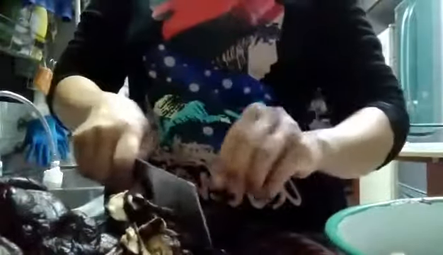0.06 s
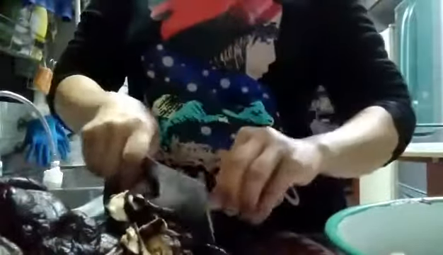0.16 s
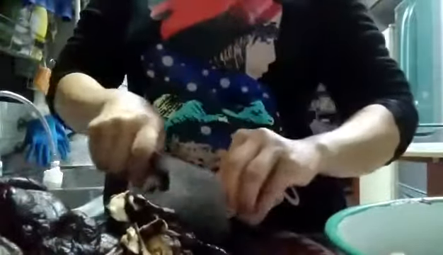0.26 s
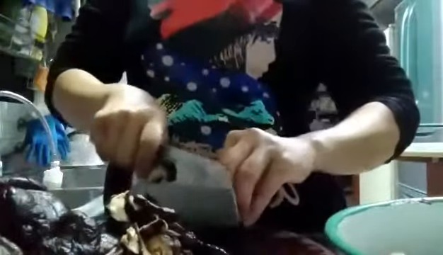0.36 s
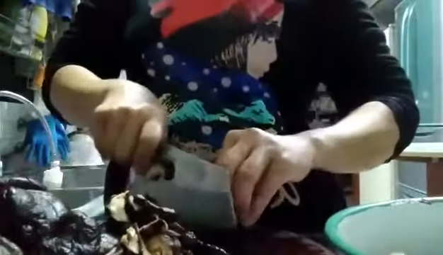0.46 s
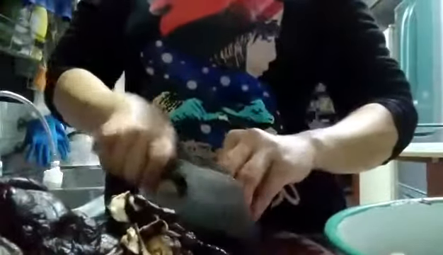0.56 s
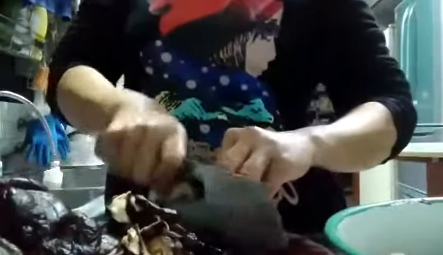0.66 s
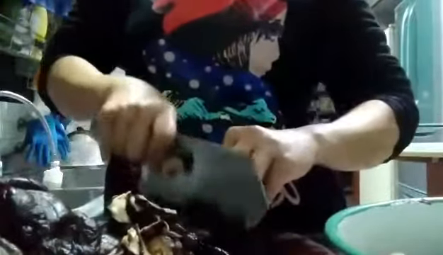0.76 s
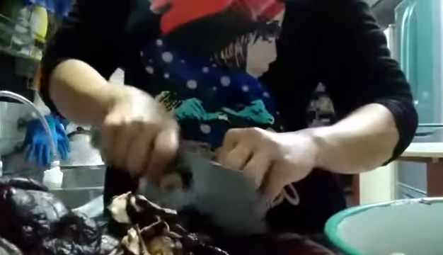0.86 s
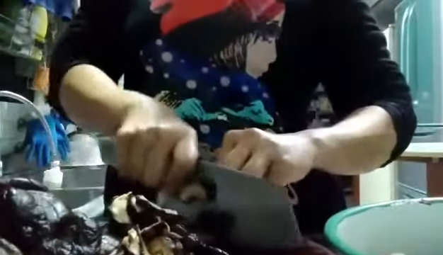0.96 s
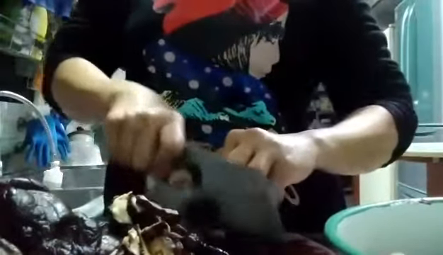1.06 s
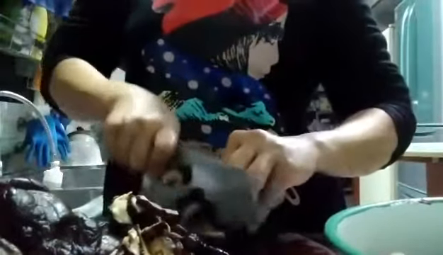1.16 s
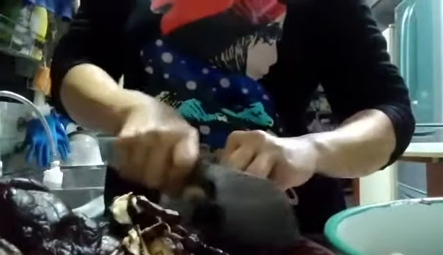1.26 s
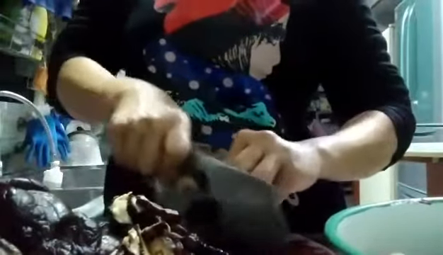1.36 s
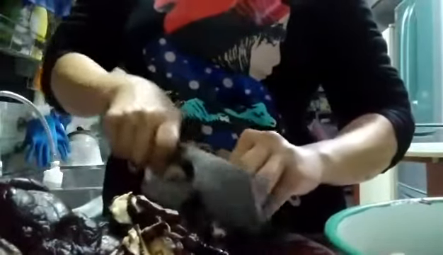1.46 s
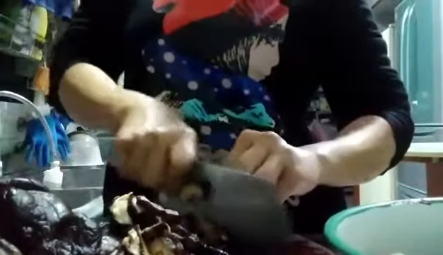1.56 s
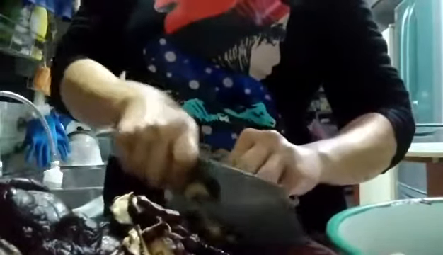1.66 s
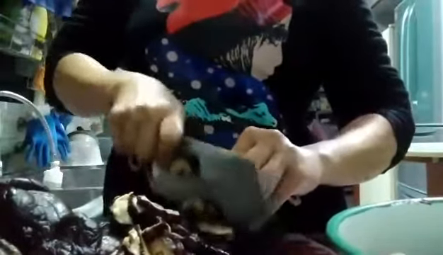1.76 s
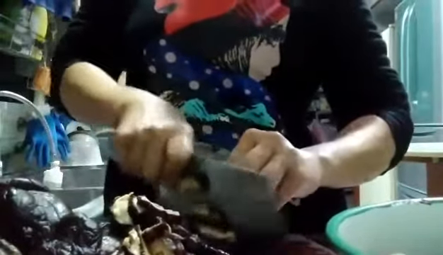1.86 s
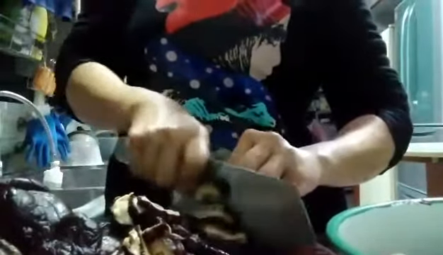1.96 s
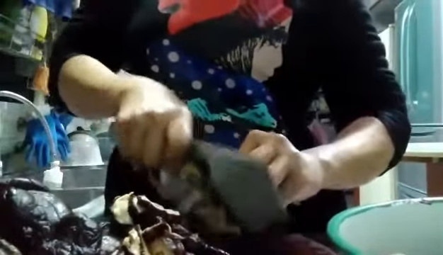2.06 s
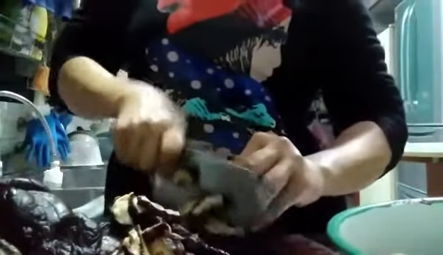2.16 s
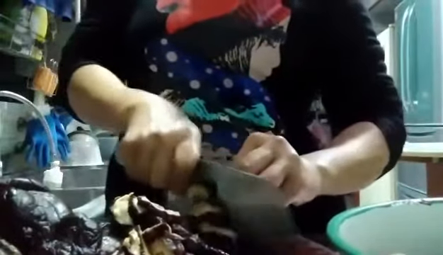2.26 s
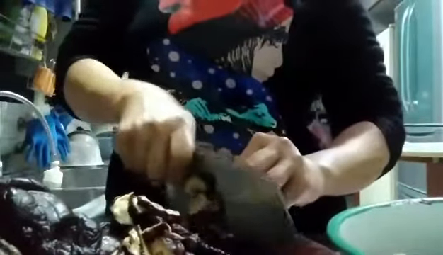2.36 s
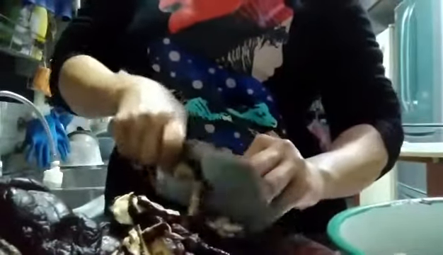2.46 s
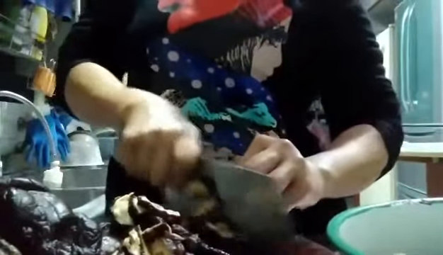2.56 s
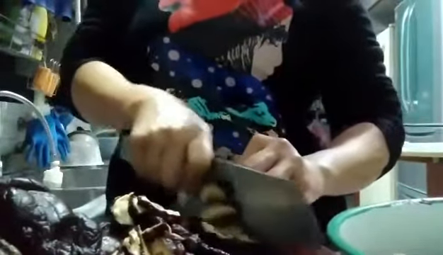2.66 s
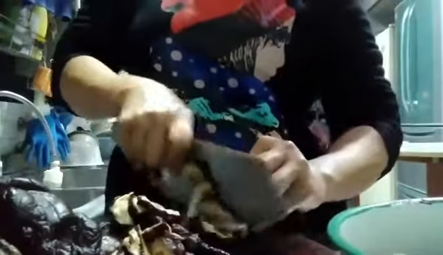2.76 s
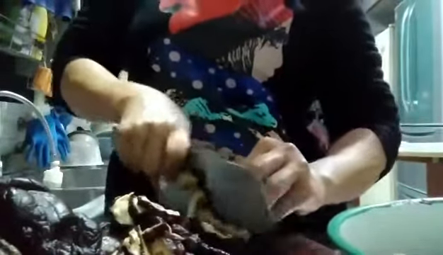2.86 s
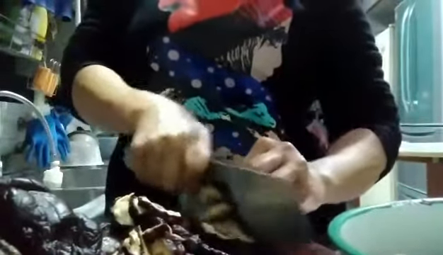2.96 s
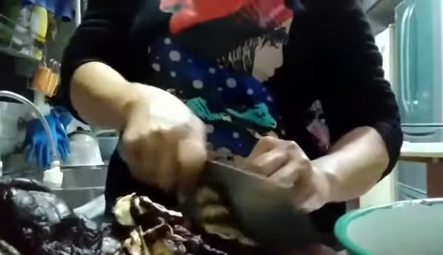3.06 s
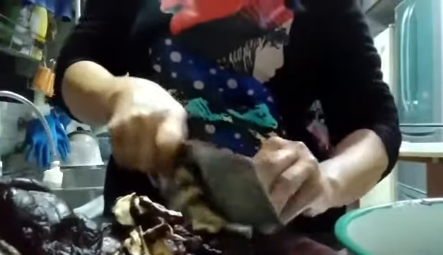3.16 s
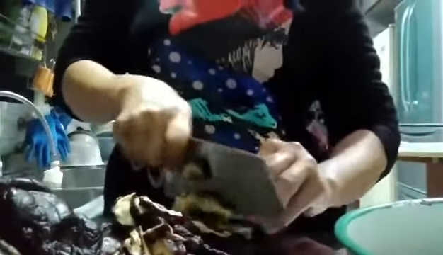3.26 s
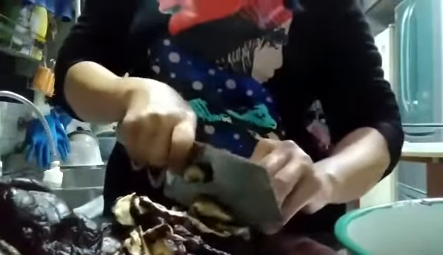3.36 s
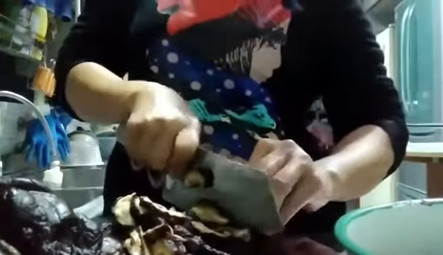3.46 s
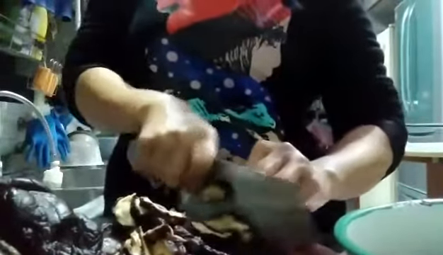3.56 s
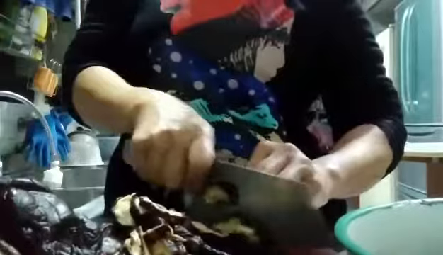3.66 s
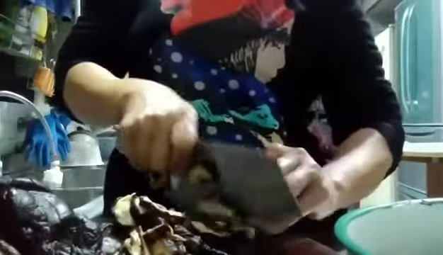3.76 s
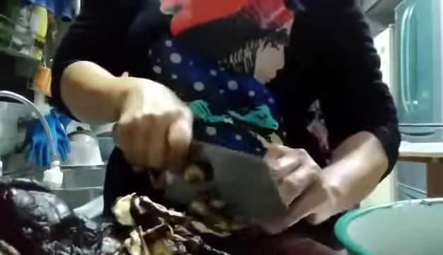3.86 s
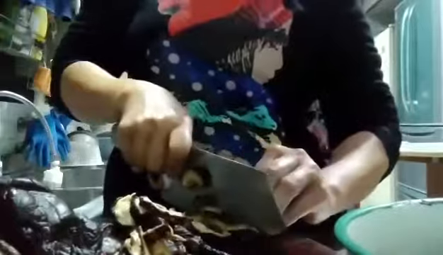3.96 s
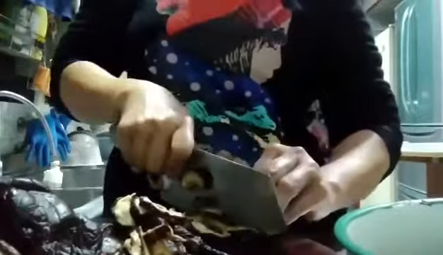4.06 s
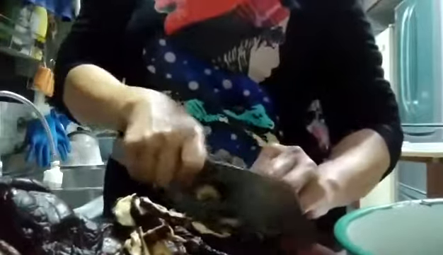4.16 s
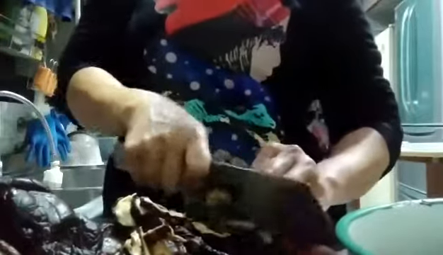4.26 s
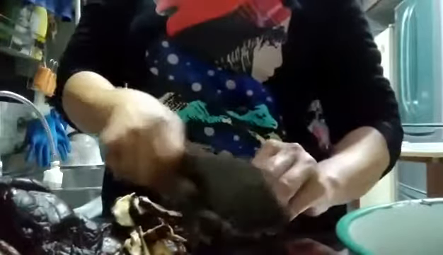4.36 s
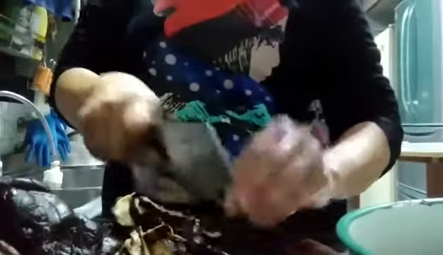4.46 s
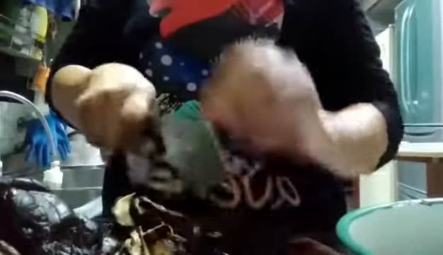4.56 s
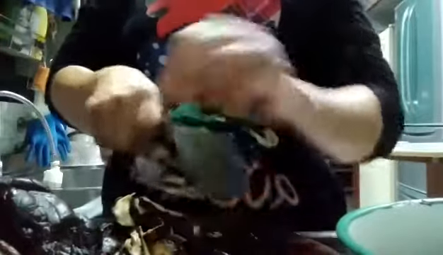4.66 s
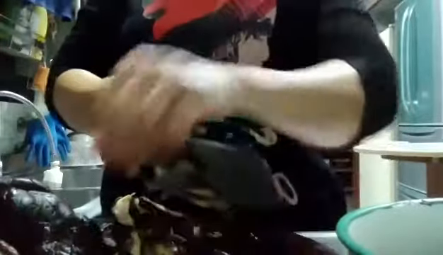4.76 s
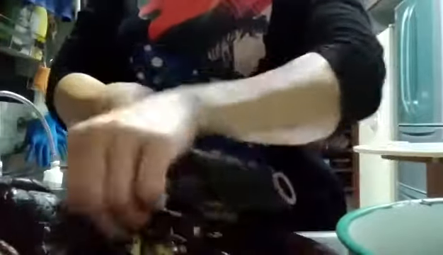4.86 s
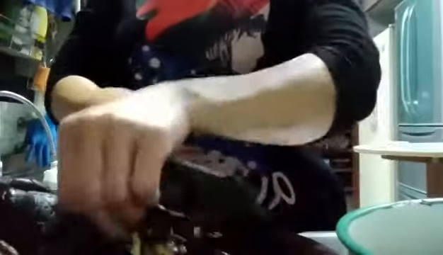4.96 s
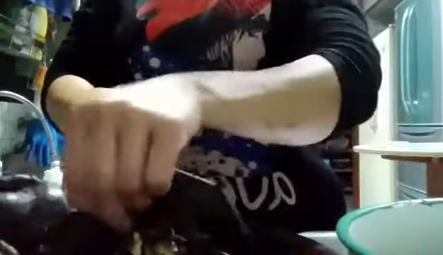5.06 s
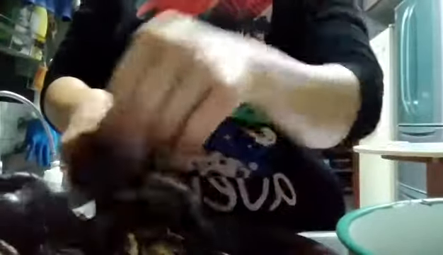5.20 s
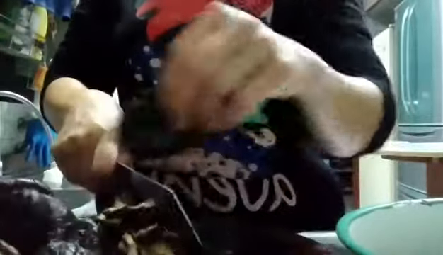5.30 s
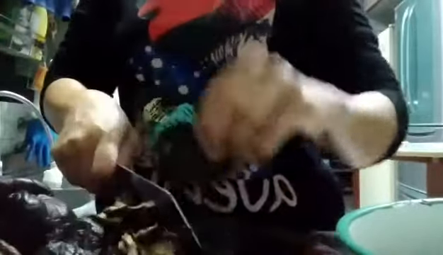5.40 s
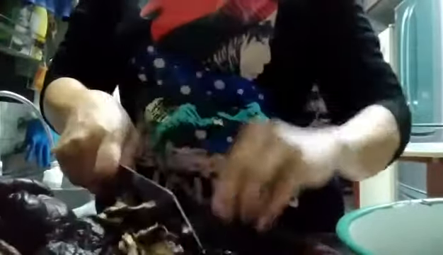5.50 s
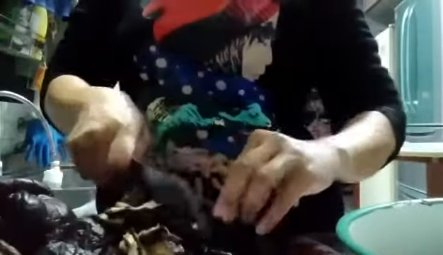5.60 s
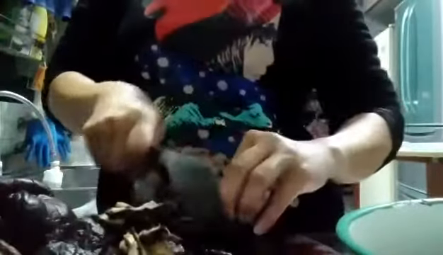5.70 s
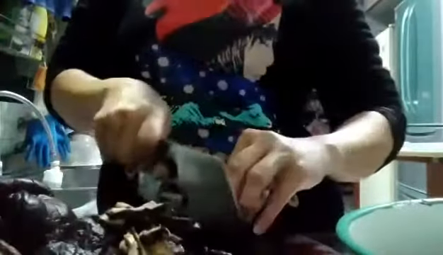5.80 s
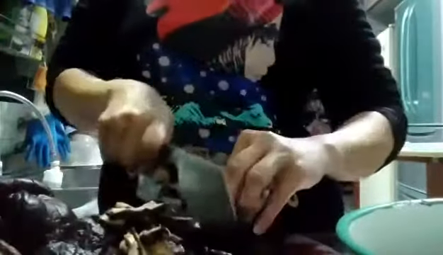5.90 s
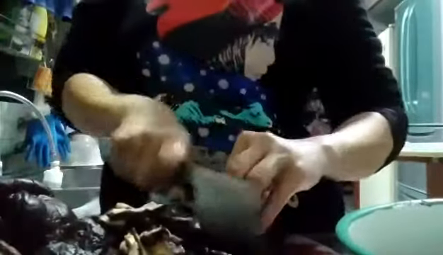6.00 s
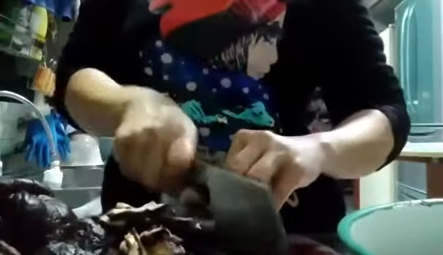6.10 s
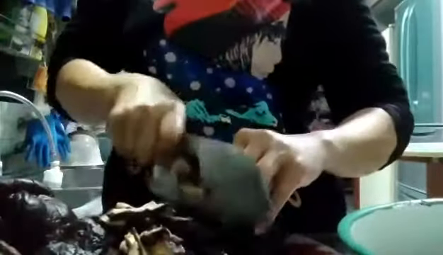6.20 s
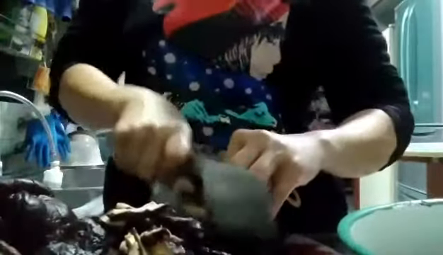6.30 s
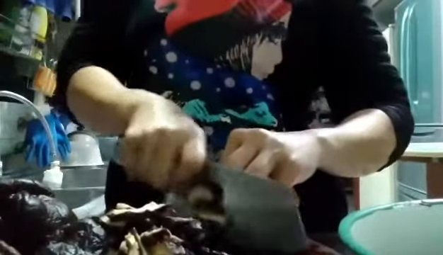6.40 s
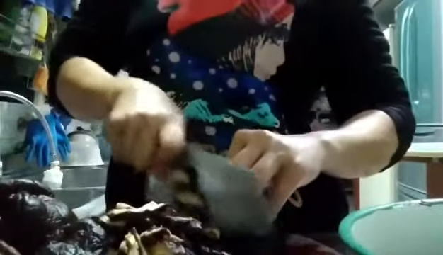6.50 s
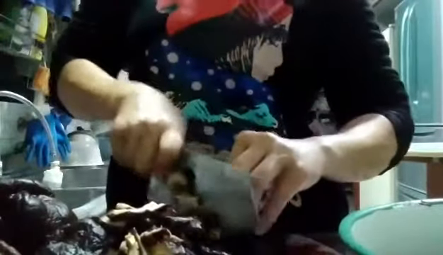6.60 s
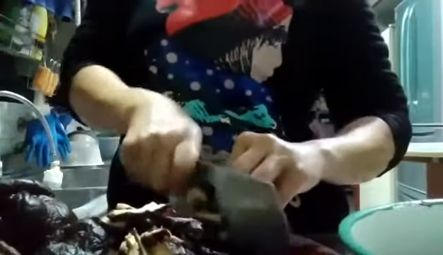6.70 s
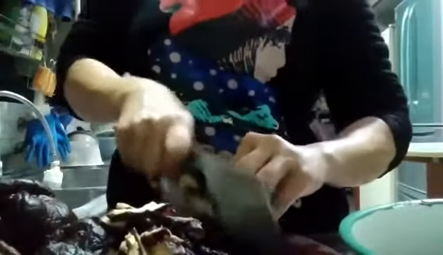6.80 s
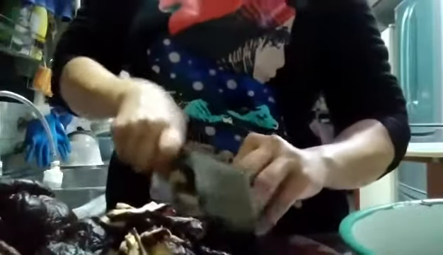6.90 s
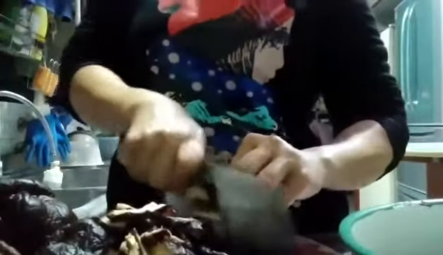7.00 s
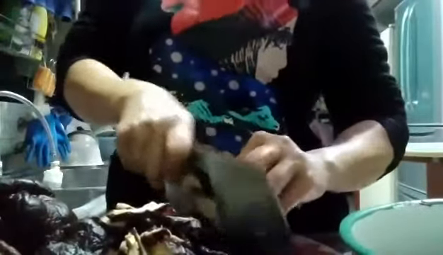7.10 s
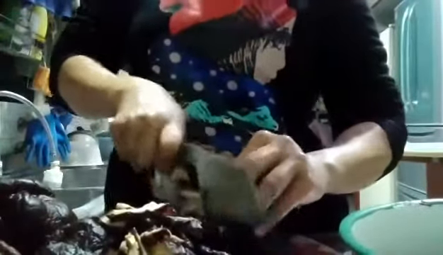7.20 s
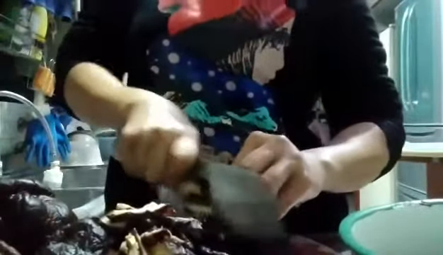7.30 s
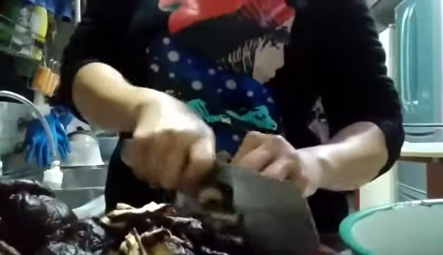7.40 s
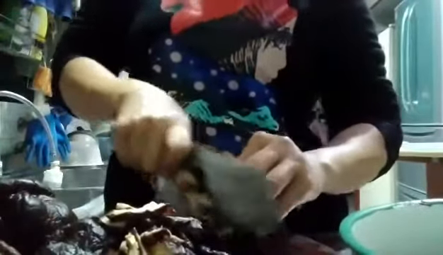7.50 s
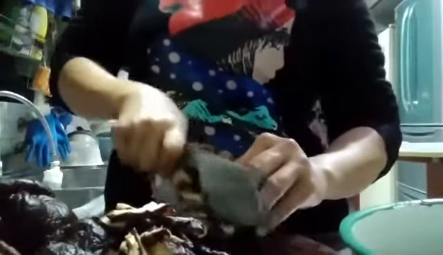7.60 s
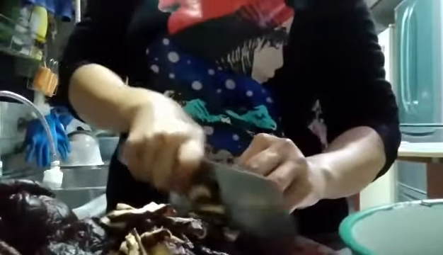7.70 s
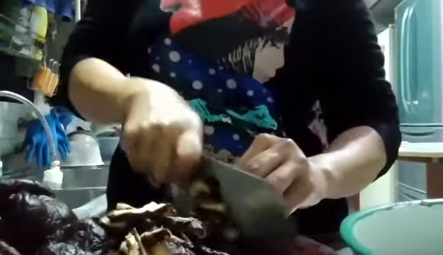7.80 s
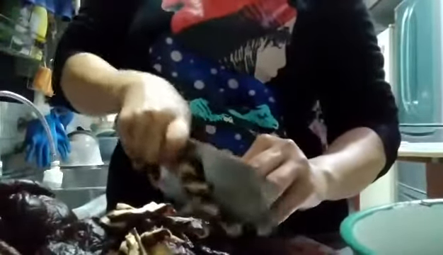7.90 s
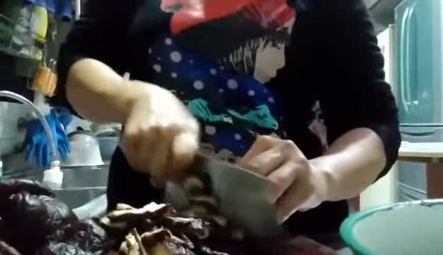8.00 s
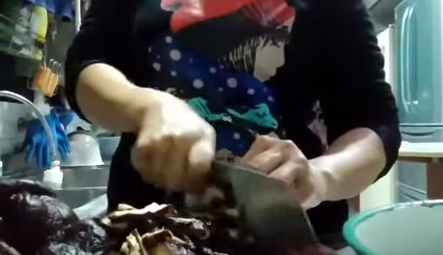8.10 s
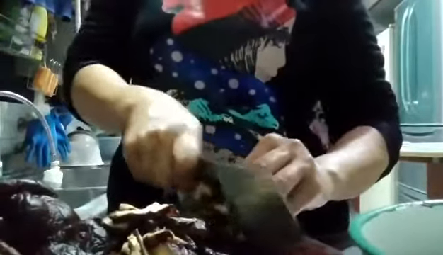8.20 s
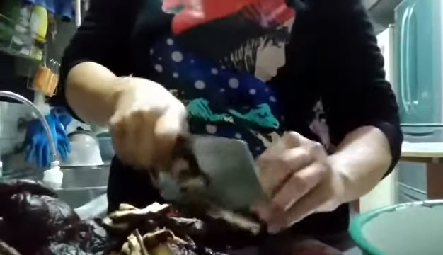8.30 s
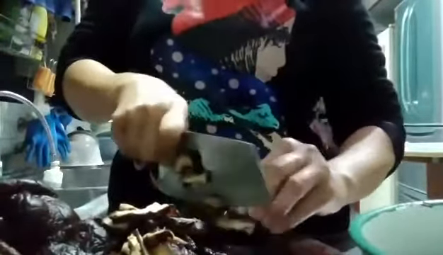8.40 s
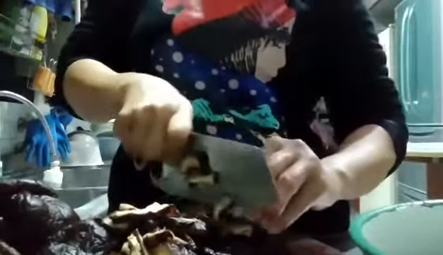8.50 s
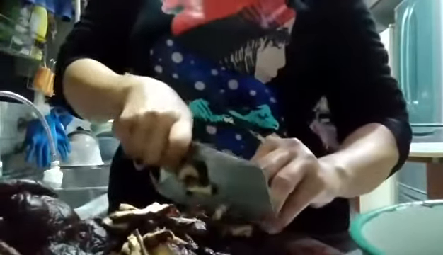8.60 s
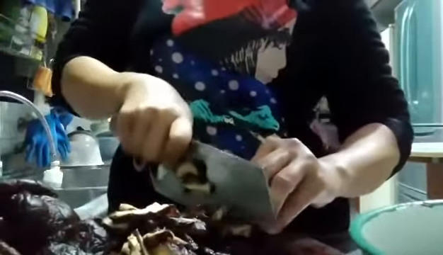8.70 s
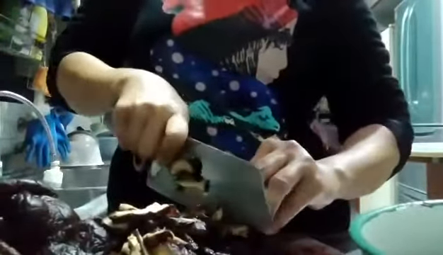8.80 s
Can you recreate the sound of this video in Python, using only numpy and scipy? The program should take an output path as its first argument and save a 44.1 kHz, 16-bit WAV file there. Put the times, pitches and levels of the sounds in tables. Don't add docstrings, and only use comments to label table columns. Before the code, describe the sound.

Very close to a thick wooden chopping board in a small hard-walled kitchen, a cleaver lands loud woody knocks with a metallic edge, about three a second. After roughly four seconds the chopping stops for nearly two seconds, then continues to the end. Faint squeaks and ticks come between blows. A low steady motor and mains hum, fan noise and light hiss run throughout; the hardest blows distort slightly.

```python
import sys
import numpy as np
from scipy import signal
from scipy.fft import rfft, irfft, next_fast_len
from scipy.io import wavfile
from scipy.ndimage import uniform_filter1d

SR = 44100
rng = np.random.default_rng(int(sys.argv[2]) if len(sys.argv) > 2 else 0)


def wav_out(sig):
    wavfile.write(sys.argv[1], SR, np.round(np.clip(np.atleast_2d(sig).T, -1, 1) * 32767).astype(np.int16))


def boost_factor(decibels):
    exponent = np.asarray(decibels, float) / 20
    return 10 ** exponent


N = 390285


def rms_one(x):
    return x / np.sqrt(np.mean(x ** 2) + 1e-20)


def at_hz(points, hz):
    points_hz, values = np.array(points).T
    return np.interp(np.log(hz), np.log(points_hz), values)


def drift(rate_hz):
    r = np.exp(-80 * np.pi * rate_hz / SR)
    slow = signal.lfilter([1], [1, -2 * r, r * r], rng.standard_normal(N // 40 + 2002))[2000:]
    return np.interp(np.arange(N) / 40, np.arange(len(slow)), rms_one(slow))


def band(x, low_hz, high_hz):
    edges_hz = [low_hz, min(high_hz, 0.45 * SR)]
    return signal.sosfilt(signal.butter(2, edges_hz, "band", fs=SR, output="sos"), x)


def resonance(x, hz, width_hz):
    r = np.exp(-np.pi * width_hz / SR)
    poles = [1, -2 * r * np.cos(2 * np.pi * hz / SR), r * r]
    return signal.lfilter(np.array([1, 0, -1]) * (1 - r * r) / 2, poles, x)


def add(out, sound, start_s):
    i = round(start_s * SR)
    out[:, i:i + sound.shape[1]] += sound[:, :N - i]


# multiple, level_db (rms)
SHAFT_LINES = [(1, -57), (2, -49), (3, -37), (6, -77), (9, -64), (12, -53.5)]
# multiple, level_db (rms)
MAINS_LINES = [(1, -38), (2, -49.5)]


def hum():
    t, out = np.arange(N) / SR, 0
    shaft_hz, mains_hum_hz = 27.127, 119.84
    for base_hz, lines in [(shaft_hz, SHAFT_LINES), (mains_hum_hz, MAINS_LINES)]:
        for multiple, level_db in lines:
            level = np.sqrt(2) * boost_factor(level_db + 0.16 * drift(2.2))
            out = out + level * np.sin(2 * np.pi * (multiple * base_hz * t + rng.random()))
    return out


# pitch_hz, level_db (per Hz)
AIR_SPECTRUM = [(22, -33), (36, -9), (55, 0.5), (95, 5), (150, -4.5), (300, -8), (500, -8.5), (850, -11.5),
                (1150, -16.5), (2500, -22), (5000, -30), (7200, -36.5), (9600, -37), (11000, -41.5),
                (14000, -37)]
# pitch_hz, likeness (-1 to 1)
PORT_LIKENESS = [(60, 1), (100, 0.89), (180, 1), (300, 0.86), (520, 0.55), (890, -0.38), (1520, -0.11),
                 (2600, -0.0047)]


def air(patchy_db):
    out, edges_hz = 0, 18 * 2 ** np.arange(0, 9.8, 1 / 3)
    white = rng.standard_normal((2, 2, N))
    for k, (low_hz, high_hz) in enumerate(zip(edges_hz, edges_hz[1:])):
        mid, side = band(white[k % 2], low_hz, high_hz)
        centre_hz = np.sqrt(low_hz * high_hz)
        alike = np.clip(at_hz(PORT_LIKENESS, centre_hz), -1, 1)
        gain = boost_factor(at_hz(AIR_SPECTRUM, centre_hz) + patchy_db * drift(3.4))
        out = out + gain * (np.sqrt(1 + alike) * mid + np.sqrt(1 - alike) * side * [[1], [-1]])
    return boost_factor(-38.5) * rms_one(out)


def wander(count, size, step):
    walks = step * np.cumsum(rng.standard_normal((count, size // 16 + 1)), axis=1)
    return uniform_filter1d(np.repeat(walks, 16, axis=1), size=32, axis=1)[:, :size]


# pitch_hz, left_db, right_db, t60_s, left_lead_rad, near_edge_db (gain toward the near edge)
BOARD_MODES = [(233, -16.5, -18.5, 0.097, 0.67, 1), (283, -14.5, -14, 0.1, 0.13, 1),
               (345.2, -18.5, -20, 0.15, 1.5, -1), (449, -32.5, -22.5, 0.1, -0.7, -2),
               (575.7, -23, -20, 0.17, 2.5, -9.5), (679.6, -21, -11.5, 0.083, 1.73, 5),
               (715.2, -13.5, -4.5, 0.066, 1.06, 0.5), (799.3, -20, -7.5, 0.074, -1.74, -4),
               (951, -13, -34, 0.05, 2.5, -8), (1167, -20.5, -42, 0.014, -5.5, 19),
               (1309, -7, -5.5, 0.033, -1.36, -12), (1384.7, -6.5, -9.5, 0.047, -1.5, 12),
               (1379, -24, -20.5, 0.15, 2.13, 7), (1458, -15, -26.5, 0.095, 0.5, 1)]
CLEAVER_MODES = [(1786, -7.5, -4, 0.025, -2.5, -11), (2120, -6.5, -3.5, 0.019, 1.5, -8),
                 (2196, -24, -7.5, 0.03, 1.87, -6), (2255, -20, -26.5, 0.12, 1.5, 7),
                 (2483, -5, -10, 0.014, 2.4, -15), (2820, -37, -35, 0.08, 1.6, -23),
                 (3202, -7.5, -8.5, 0.018, 2.5, -1), (3833, -29.5, -41, 0.062, 8, -14),
                 (4200, -17.5, -27, 0.015, -9.5, 23), (5300, -14, -18, 0.012, -2.3, -5)]


def ring(t, peak_db, hard, near, flat_db, weight_db):
    modes = np.concatenate([BOARD_MODES, CLEAVER_MODES])
    hz, left_db, right_db, t60_s, lead, near_edge_db = modes.T[:, :, None]
    strength, detune, slip = rng.standard_normal((3, len(hz), 1))
    low = hz < 420
    colour_db = hard * np.log2(np.maximum(hz, 900) / 1200) + weight_db * low + near_edge_db * near
    cross_modes = np.exp(-(np.log2(hz / 2200) / 0.34) ** 2)
    thud = 0.3 * np.log2(hz / 280) * low
    colour_db = colour_db + flat_db * (cross_modes + thud)
    level_db = peak_db + 1.5 + colour_db + 1.45 * strength
    turn = 2 * np.pi * hz * (1 + 0.012 * detune) * t
    turn = turn + np.minimum(hz, 1600) / 1400 * wander(len(hz), len(t), step=0.3)
    port_slip = 0.86 * slip * np.minimum(hz / 800, 1) ** 2
    left = boost_factor(level_db + left_db) * np.sin(turn + lead / 2 + port_slip)
    right = boost_factor(level_db + right_db) * np.sin(turn - lead / 2)
    dying = boost_factor(-60 * t / t60_s) * (1 - np.exp(-(t / 0.0015) ** 2))
    return np.array([(dying * left).sum(axis=0), (dying * right).sum(axis=0)])


def rattle(t, hard):
    low_hz, top_hz, t60_s, rise_s = 1250, 2600, 0.43, 0.008
    noise = band(band(rng.standard_normal((2, len(t))), low_hz, top_hz), low_hz, top_hz)
    return noise * boost_factor(-29.5 + 1.1 * hard - 60 * t / t60_s) * (1 - np.exp(-t / rise_s))


def thump(t):
    return np.sin(2 * np.pi * 54 * t) * boost_factor(-60 * t / 0.12) * (1 - np.exp(-t / 0.0035))


# start_s, peak_db, hardness_db_per_octave, spot (-1 far edge to 1 near edge), flatness_db
BLOWS = [(0.514, -2, 2.5, 0.25, 1.5), (0.863, -9, -4, 0.082, -7.5), (1.185, -1.5, -3, -0.041, -5),
         (1.517, -1.5, -5, 0.18, -2.2), (1.858, -4.5, -2.5, -0.19, -4.5), (2.178, 2, 2.5, -0.14, 1.6),
         (2.55, 1, -4, -0.18, -2.5), (2.899, 1, -3, -0.51, 1.3), (3.514, -2, -1, -0.12, -10.5),
         (4.126, -3.5, -5, -0.7, -3), (5.942, 2.5, 0, 0.015, 4), (6.294, -3, -5, 0.2, 3.5),
         (6.617, -3, -2, 0.0036, -12), (6.922, 5, 2, 0.091, 3), (7.288, -3, -3.5, -0.029, 0.3),
         (7.657, -4, -3, -0.036, -1.5), (8.004, -2, -4, 0.0039, -1)]


def chops():
    out, t = np.zeros((2, N)), np.arange(SR // 3) / SR
    hiss_size = SR // 80
    for start_s, peak_db, hard, near, flat_db in BLOWS:
        weight_db = 1 - 0.04 * peak_db + 0.29 * hard - 1.5 * near
        crack_db = -18.5 + 0.68 * hard + 11 * near - 0.2 * peak_db - 0.5 * flat_db
        noise = band(band(rng.standard_normal((2, len(t))), 990, 4200), 1100, 16000)
        hiss = noise[:, -hiss_size:] * np.linspace(0, 1, hiss_size)
        add(out, boost_factor(peak_db - 39) * hiss, start_s - 0.011)
        dying = boost_factor(crack_db - 60 * t / 0.013) + boost_factor(-32.5 - 60 * t / 0.35)
        crack = noise * dying * (1 - np.exp(-t / 0.0019))
        blow = ring(t, peak_db, hard, near, flat_db, weight_db)
        blow = blow + boost_factor(peak_db + 2.5) * (crack + rattle(t, hard))
        blow = blow + boost_factor(peak_db + weight_db - 21) * thump(t)
        add(out, blow, start_s + 0.00143)
    return out


def kitchen(x):
    size = next_fast_len(N + SR)
    hz = np.arange(size // 2 + 1) * SR / size
    t60_s = 0.47 / (1 + (hz / 5500) ** 2)
    answer = np.zeros((2, len(hz)), complex)
    for k, lag_s in enumerate(rng.uniform(0.012, 0.045, 20)):
        round_trip = boost_factor(-60 * lag_s / t60_s) * np.exp(-2j * np.pi * hz * lag_s)
        answer[k % 2] += round_trip / (1 - round_trip) * (-1) ** (k // 2)
    for lag_s in (0.0013, 0.0031, 0.0057):
        delay = np.exp(-2j * np.pi * hz * lag_s)
        answer *= (delay - 0.6) / (1 - 0.6 * delay)
    apart = 1 / (1 + (600 / np.maximum(hz, 1)) ** 4)
    answer[1] = apart * answer[1] + (1 - apart) * answer[0]
    return irfft(rfft(x, size) * answer, size)[:, :N]


# start_s, peak_db, length_s, pitch_hz (centre)
FLESH_SQUEAKS = [(0.783, -39, .033, 5270), (1.108, -54, 0.023, 6000), (1.124, -51, 0.045, 5300),
                 (1.45, -47.5, .039, 5540), (1.771, -49, 0.035, 4500), (2.199, -44, 0.077, 5200),
                 (3.523, -45.5, .089, 4200), (3.626, -39.5, 0.019, 4300), (4.255, -38, 0.034, 4450),
                 (6.381, -43.5, 0.036, 4300), (6.692, -53, .045, 4500), (7.395, -44, 0.035, 4200),
                 (8.117, -44, 0.047, 4960)]
# start_s, peak_db
EDGE_TICKS = [
    (2.111, -39.5),
    (2.17, -37),
    (4.94, -36),
    (6.858, -40.5),
]
# start_s, peak_db, pitch_hz (centre)
FLAT_KNOCKS = [
    (0.784, -40.5, 2200),
    (1.12, -47, 1750),
    (4.247, -30, 1850),
    (4.253, -28, 520),
]
# pitch_hz, width_hz, level_db
BLADE_MODES = [(520, 230, 4), (1730, 220, 18), (2290, 130, 11), (2740, 320, 15), (3950, 400, 8.5),
               (4510, 140, -1), (5300, 180, 0), (6200, 360, -44), (7650, 900, -32), (9600, 1300, -7)]


def rubs():
    out, t = np.zeros((2, N)), np.arange(SR // 8) / SR
    # start_s, peak_db, length_s, pitch_hz, spread in octaves
    strokes = [(s, db, length_s, hz, 0.5) for s, db, length_s, hz in FLESH_SQUEAKS]
    strokes += [(s, db, 0.017, 3000, 2.5) for s, db in EDGE_TICKS]
    strokes += [(s, db, 0.025, hz, 0.89) for s, db, hz in FLAT_KNOCKS]
    for start_s, peak_db, length_s, centre_hz, octaves in strokes:
        slips = rng.standard_normal((2, len(t))) * boost_factor(6 * rng.standard_normal(len(t)))
        bunches = np.repeat(rng.standard_normal(len(t) // 64 + 1), 64)[:len(t)]
        slips = slips * boost_factor(4 * bunches)
        stroke = np.sin(np.pi * np.clip(t / length_s, 0, 1) ** 0.51) ** 0.65
        rings = 0
        for hz, width_hz, mode_db in BLADE_MODES:
            off_centre = np.log2(hz / centre_hz) / octaves
            level_db = mode_db + 3.3 * rng.standard_normal() - 4.8 * off_centre ** 2
            rings = rings + boost_factor(level_db) / np.sqrt(width_hz) * resonance(slips * stroke, hz, width_hz)
        add(out, boost_factor(peak_db - 1.5) * rms_one(rings) * np.sqrt(length_s / t[-1]), start_s)
    return out


def scene():
    work = chops() + rubs()
    return work + boost_factor(-26) * kitchen(work) + hum() + air(patchy_db=-0.66)


def low_pass(x):
    return signal.sosfilt(signal.butter(12, 16300, fs=SR, output="sos"), x)


def record(dry):
    heard = dry + boost_factor(10.5) * resonance(dry, hz=9690, width_hz=810)
    heard = signal.sosfilt(signal.butter(6, 10560, fs=SR, output="sos"), heard)
    ceiling, knee = 1.0, 13
    mix = heard / (1 + np.abs(heard / ceiling) ** knee) ** (1 / knee)
    return low_pass(mix)


dry = scene()
out = record(dry)
wav_out(out)
```